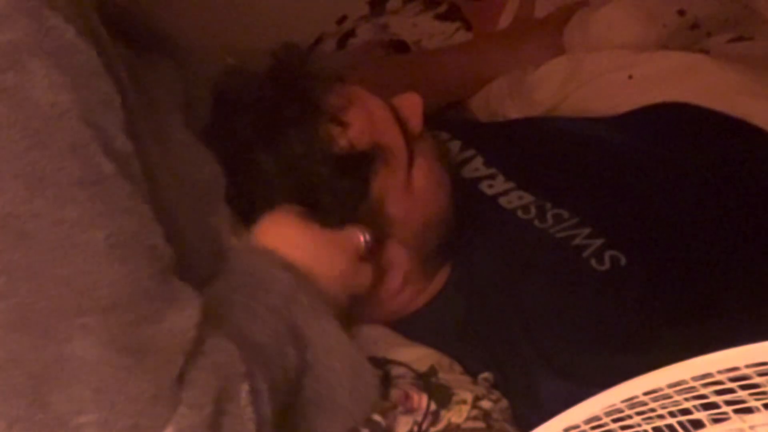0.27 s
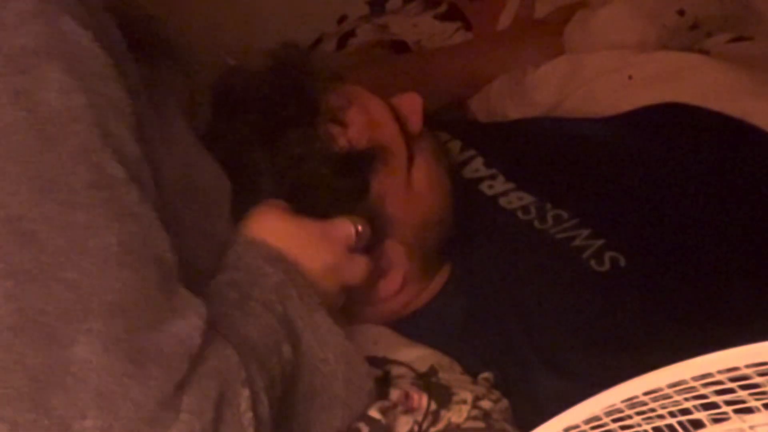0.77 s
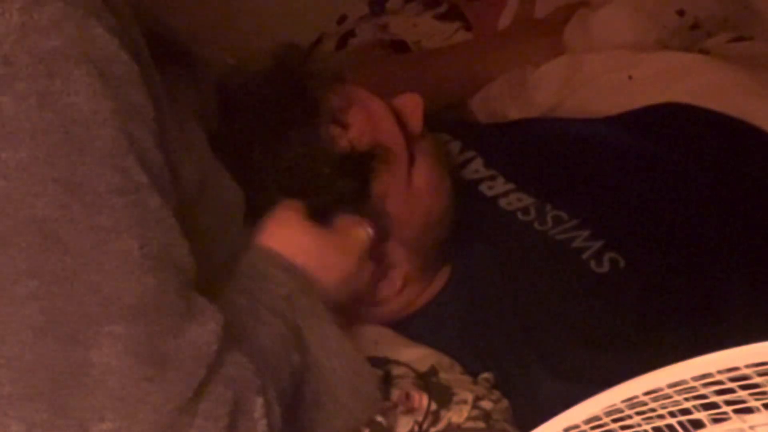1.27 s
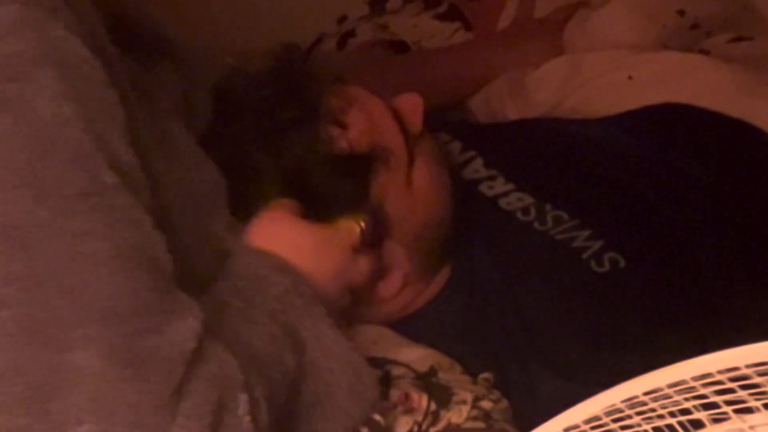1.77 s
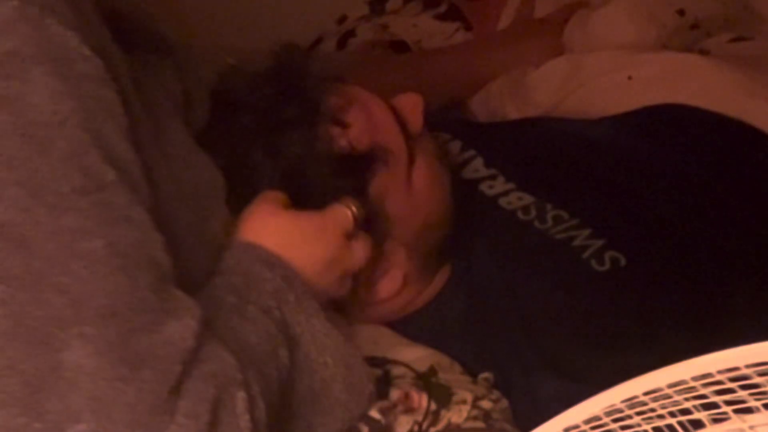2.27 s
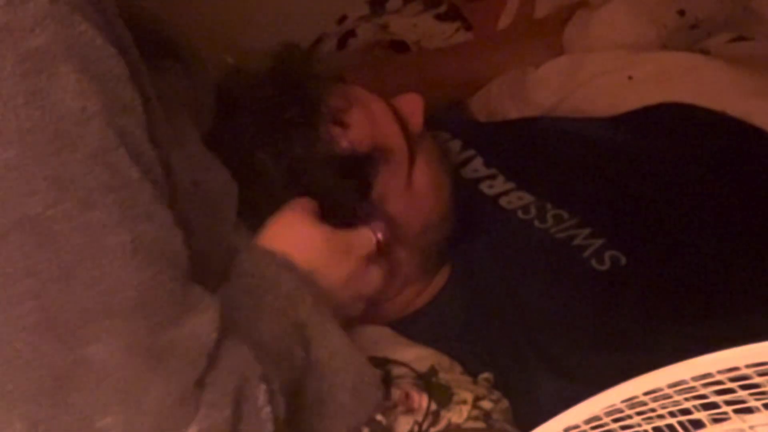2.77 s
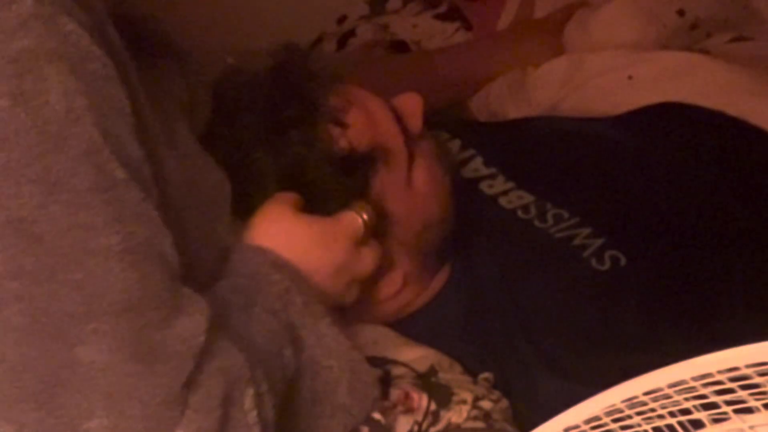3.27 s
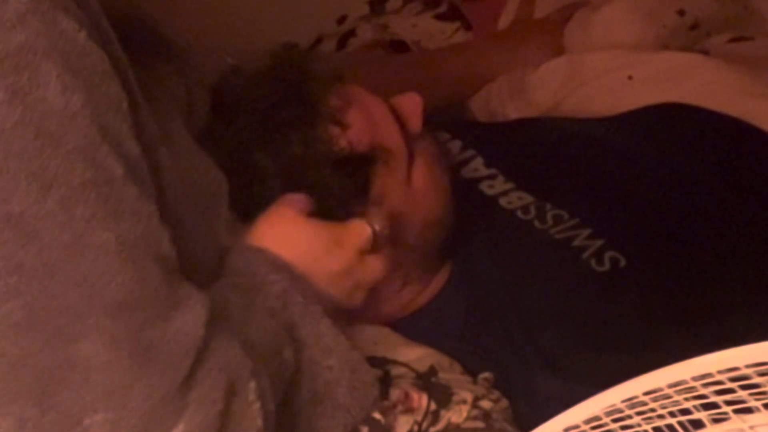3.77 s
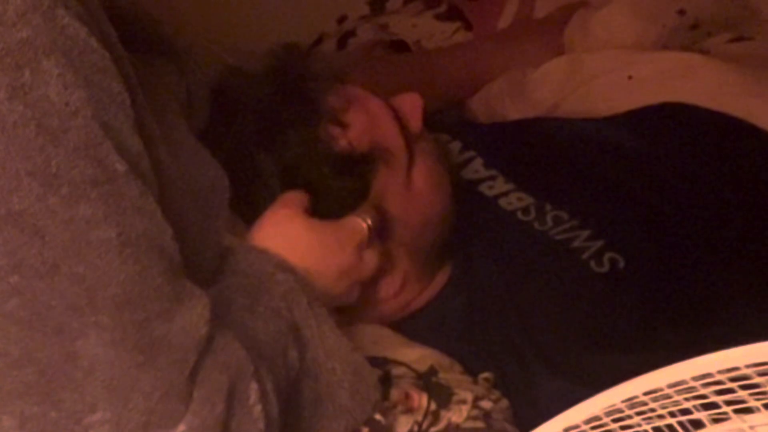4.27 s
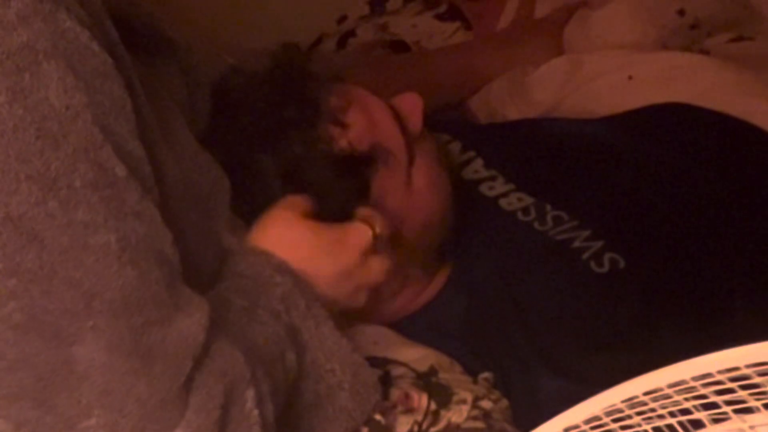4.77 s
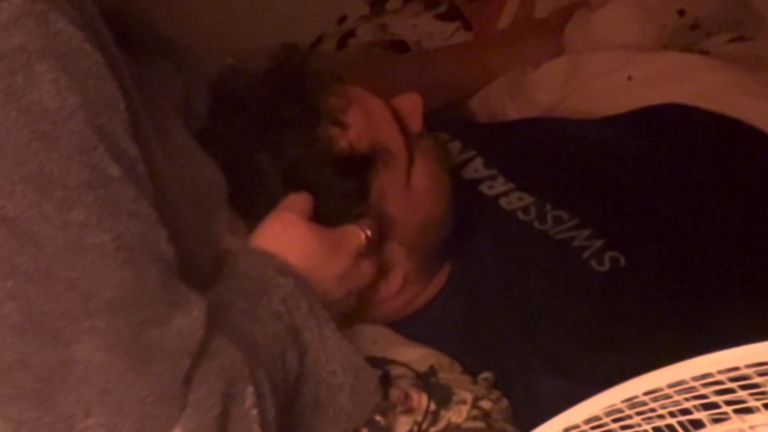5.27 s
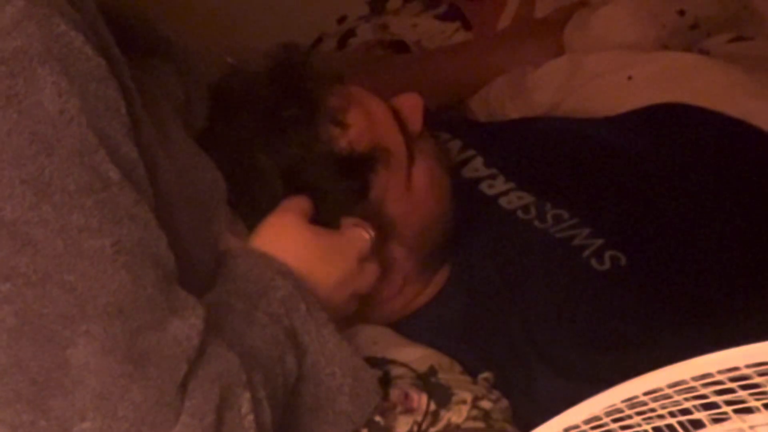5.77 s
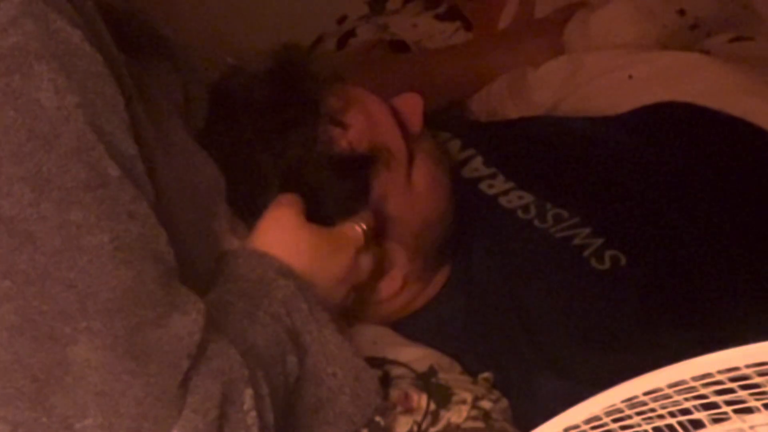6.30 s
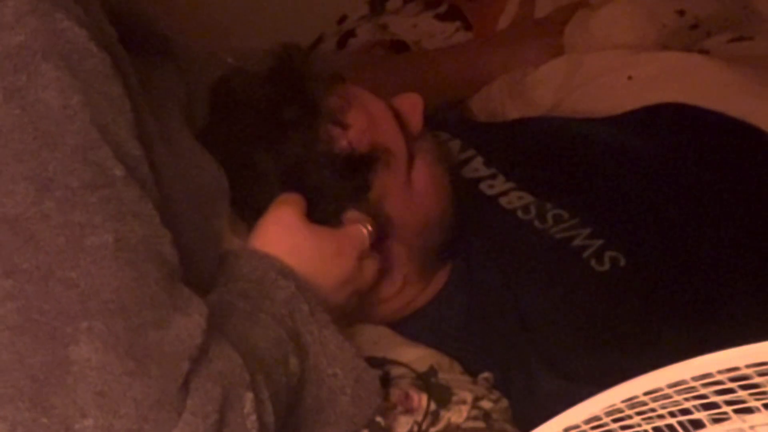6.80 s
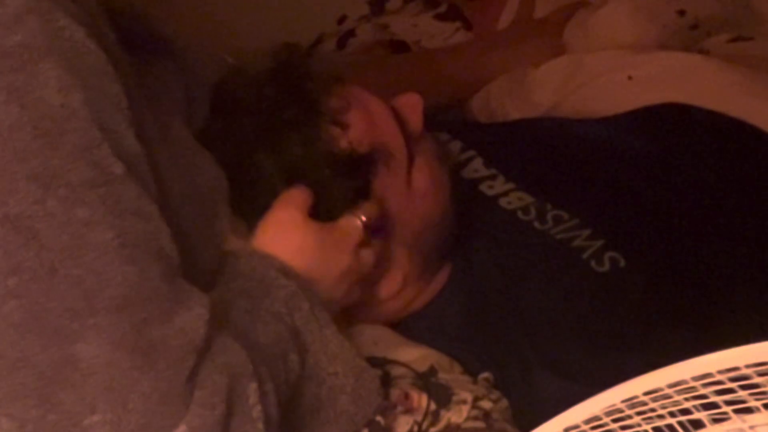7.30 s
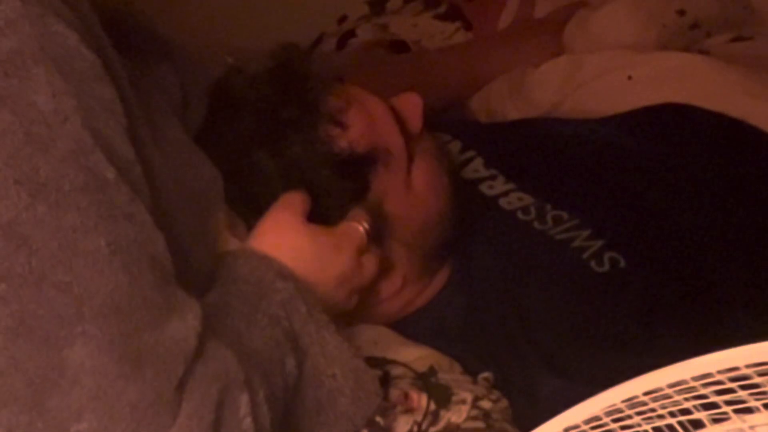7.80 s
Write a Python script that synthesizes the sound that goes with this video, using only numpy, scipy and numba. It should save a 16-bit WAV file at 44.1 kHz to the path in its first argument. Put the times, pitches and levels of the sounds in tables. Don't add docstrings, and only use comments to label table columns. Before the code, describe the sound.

A steady, deep mains hum and faint fan rush with weak motor tones run throughout, with slow low air movement at the microphone. From 0 s fingertips scratch hair very close by: short bright, papery crackles made of tiny ticks, with a cluster of sharp snaps at 0.2-0.5 s and a softer drag to about 1 s. Gentler strokes follow at 1.2, 1.6 and 2 s, with dull sleeve brushes on bedding, notably a bump near 2.6 s. Quick small scratches come at 2.9-3.7 s, then a pause. A crisp, snapping burst with light scalp knocks fills 4.1-4.6 s. Dense crackling returns at 5.1-5.6 s, then cloth rustles to 5.9 s. Another snappy flurry runs 6.2-6.7 s, a short cloth thump lands at 7.1 s, and final dry scratches at 7.3-7.8 s end with a small rustle near 8 s. No echo.

```python
import sys
import numpy as np
from scipy import signal
from scipy.io import wavfile
from scipy.ndimage import uniform_filter1d
from numba import njit

SR = 44100
rng = np.random.default_rng(int(sys.argv[2]) if len(sys.argv) > 2 else 0)


def voltage_ratio(decibels):
    exponent = np.asarray(decibels, float) / 20
    return 10 ** exponent


def digitize_waveform(pressure):
    field = np.atleast_2d(pressure).T
    bounded = np.clip(field, -1, 1)
    quanta = np.round(bounded * 32767).astype(np.int16)
    wavfile.write(sys.argv[1], SR, quanta)


N = 354828

# (per Hz, relative)
FAN_SPECTRUM = [(60, 9.5), (120, 4), (250, -4), (500, -26), (1000, -17.5), (2000, -32), (4000, -18),
                (7000, -22.5), (11000, -22.5), (17000, -16)]
MOTOR_TONE_HZ = [100.1, 150, 249.8, 349.8, 495.8, 589.1, 908.6, 949.4, 991.1]
MOTOR_TONE_DB = [-70, -81, -75, -69, -81, -75.5, -74, -84, -90]
# start_s, length_s, end_level_db, ring_hz,
# scrape_db (dull scalp scrape over crackle)
DRAGS = [(.0, 0.11, -58.5, 10500, 4), (.14, 0.095, -51.5, 11800, -11), (.3, 0.16, -48.5, 11960, -20),
         (.5, 0.086, -50, 11700, -10), (.64, 0.32, -53, 10700, -4), (1.18, 0.1, -52.5, 10660, -3),
         (1.57, 0.36, -50.5, 12050, -16), (1.97, 0.31, -52.5, 10570, -6), (2.52, 0.077, -54.5, 10900, -8),
         (2.86, 0.083, -58.5, 11700, -5), (3.0, .09, -53, 11300, -9), (3.16, 0.084, -53.5, 10800, -9),
         (3.32, .16, -51.5, 10600, -9.5), (3.63, .12, -64, 10700, -2), (4.08, 0.085, -53, 10800, -12),
         (4.19, 0.38, -50.5, 10960, -8.5), (5.14, 0.26, -51.5, 11500, -12),
         (5.37, 0.26, -51.5, 11100, -8.5), (6.22, 0.22, -55.5, 11200, -13), (6.53, 0.21, -49.5, 11200, -7),
         (7.07, 0.056, -61, 11200, -13), (7.33, 0.25, -54.5, 11300, -10), (7.62, 0.22, -49.5, 10800, -7),
         (7.94, .04, -63, 11500, -9)]
# time_s, share (1 = crisp)
DRYNESS = [(0, 0.29), (.7, 0.34), (2.4, 0.23), (3.1, 0.66), (3.4, 0.35), (4.05, 0.37), (4.25, 0.8),
           (5.4, 0.39), (5.6, 0.3), (6.3, 0.66), (6.75, .5), (7.5, 1)]
# start_s, length_s, level_db,
# brightness_db (swish up and rumble down), hollow_db (fold over the rest)
SLEEVE_STROKES = [(0, 0.17, -52.5, -0.5, -0.5), (.25, 0.36, -58.5, -1, 1), (.9, 0.13, -64, 5.5, 3),
                  (1.18, .13, -56, 0.5, -2.5), (1.6, 0.3, -60, -1, -8), (2.44, 0.1, -62.5, 4.5, 10),
                  (2.575, 0.066, -51, 0, -2.5), (2.68, 0.064, -55.5, -1, -5), (3.03, .35, -61, -3, 2.5),
                  (3.63, 0.17, -56, -0.5, -7), (4.35, 0.054, -69, 0, 8), (4.55, 0.31, -58.5, -1, -6),
                  (5.38, 0.17, -58.5, -1.5, -2.5), (5.68, 0.13, -55, -1.5, -1),
                  (5.89, 0.044, -55, -2.5, -3.5), (6.15, 0.23, -60.5, -5, 1), (6.6, 0.22, -62, 0, -8),
                  (7.085, 0.039, -47, -2, -7.5), (7.35, 0.43, -63, -0.5, 0), (7.93, 0.056, -54, 0, -1.5)]
# start_s, length_s, rate_per_s, peak_db
SNAP_FLURRIES = [(.18, .34, 35, -37), (1.79, .14, 30, -41), (2.98, .08, 50, -37), (3.2, .05, 40, -40),
                 (4.15, .16, 90, -37), (4.35, .21, 60, -37), (5.15, .07, 200, -37), (5.24, .08, 220, -36),
                 (5.33, .26, 60, -39), (6.24, .41, 90, -38), (7.52, .31, 30, -39)]
# time_s, peak_db, ring_hz
SCALP_KNOCKS = [(.1856, -37, 11700), (.5096, -33.5, 11300), (0.5165, -32, 11100), (3.237, -38, 11200),
                (4.141, -28.5, 9400), (4.2751, -33, 9900), (4.2971, -34, 10000), (4.3523, -35, 10700),
                (4.481, -26, 11700), (5.2703, -29, 11800), (5.35, -31, 11600), (5.3856, -29, 11800),
                (5.4693, -28, 10800), (5.5307, -31, 10700), (5.584, -45, 10700), (6.346, -29.5, 10500),
                (6.43, -32, 10600), (6.443, -27.5, 10900), (6.4812, -26, 11300), (6.5296, -41, 11500),
                (6.5743, -28.5, 11600), (7.627, -30, 11800), (7.7179, -32, 11200), (7.8177, -31, 10600)]
# time_s, peak_db, ring_hz, dull_db (dull part over ring)
LOUD_SNAPS = [(.2751, -26, 12200, -21), (.3225, -29, 10700, -25), (.3647, -24, 12600, -13),
              (.4448, -21, 11400, -15), (.4907, -26, 11200, -24), (1.7799, -34, 11700, -19),
              (2.9765, -31, 11800, -16), (3.0523, -34, 11600, 0), (3.0696, -28, 10300, -8),
              (3.334, -30, 11600, -9), (4.1377, -21, 10460, -10), (4.2087, -34, 10500, -23),
              (4.2314, -31, 10100, -9), (4.3225, -35, 11000, -12), (4.3394, -27, 10800, -6),
              (4.3465, -23, 10200, -22), (4.387, -25, 11000, -16), (5.2019, -27, 10600, -25),
              (5.248, -24, 11300, -25), (5.2778, -33, 11200, -16), (5.2974, -24, 11400, -26),
              (6.2955, -29, 10800, -15), (6.3724, -31, 10900, -21), (6.419, -24, 11700, -18),
              (6.475, -32, 11300, -22), (6.4897, -25, 12200, -10), (6.5108, -25, 11200, -20),
              (7.409, -29, 10500, -10), (7.4696, -28, 10400, -15), (7.546, -26.5, 10700, -6)]

HUM_HZ, HUM_DB, HUM_PHASE_RAD = 49.955, -32.5, -1.27
AIR_HZ, AIR_DB = 5.6, -37
FAN_DB = -54
DRAG_SWELL_DB_PER_S, DRAG_RISE_DB_PER_S, DRAG_FALL_DB_PER_S = 20, 178, 330
HAND_REST = (-72, 11200, -4)  # level_db, ring_hz, scrape_db of fingers lying in the hair
RING_HZ_PER_DB = 69
RING_WIDTH_HZ, RING_WANDER = 3500, .06
BRUSH_RISE_DB_PER_S, BRUSH_FALL_DB_PER_S = 95, 210
CLOTH_REST = (-67, 1.5, -1)  # level_db, brightness_db, hollow_db
RUMBLE_DB, SWISH_DB, SHEEN_DB = -0.4, -3, -7.5
FLURRY_DB, FLURRY_SPREAD_DB, FLURRY_SPREAD_HZ = 3.4, -1.5, 380
FLURRY_DULL_DB, FLURRY_DULL_SPREAD_DB = -27, 1
KNOCK_DULL_DB = -10
TOP_HZ, END_S, FADE_S = 15770, 8.046, .004


def level(x, db):
    return x * voltage_ratio(db) / np.sqrt(np.mean(x ** 2))


@njit
def svf(x, hz, width):
    y, band_state, low_state = np.empty(len(x)), 0., 0.
    for i in range(len(x)):
        g = np.tan(np.pi * hz[i] / SR)
        damping = width / hz[i]
        v = (band_state + g * (x[i] - low_state)) / (1 + g * (g + damping))
        band_state = 2 * v - band_state
        low_state = low_state + 2 * g * v
        y[i] = damping * v
    return y


def band(x, hz, width):
    return svf(x, np.clip(hz * np.ones(N), 1., .45 * SR), 1. * width)


def walk(rate):
    k = int(SR / rate)
    held = np.repeat(rng.standard_normal(N // k + 1), k)
    return 0.86 * uniform_filter1d(uniform_filter1d(held, k), k)[:N]


def slips(rate, spread_db):
    happens = rng.random(N) < rate / SR
    size = rng.exponential(size=N)
    sign = rng.choice([-1., 1.], N)
    return level(happens * sign * voltage_ratio(spread_db * size), 0)


def gestures(table, rest, rise, fall, swell):
    t = np.arange(0, N, 32) / SR
    start, length, db, *columns = (c[:, None] for c in np.transpose(table))
    late = t - start - length
    ramp_db = -rise * np.clip(start - t, 0, None) - fall * np.clip(late, 0, None)
    power = voltage_ratio(db + swell * np.clip(late, -length, 0) + ramp_db) ** 2
    rest_power = voltage_ratio(rest[0]) ** 2
    total = power.sum(axis=0) + rest_power
    shortfall_db = 10 * np.log10(power + 1e-18) - db
    curves = [10 * np.log10(total), (power * shortfall_db).sum(axis=0) / total]
    for column, at_rest in zip(columns, rest[1:]):
        curves.append(((power * column).sum(axis=0) + rest_power * at_rest) / total)
    return [np.interp(np.arange(N) / SR, t, c) for c in curves]


def hum():
    tone = np.sqrt(2) * voltage_ratio(HUM_DB) * np.cos(2 * np.pi * HUM_HZ * np.arange(N) / SR + HUM_PHASE_RAD)
    air = band(rng.standard_normal(N), .5 * AIR_HZ, AIR_HZ) * voltage_ratio(6.3 * walk(1.655))
    air = signal.sosfilt(signal.butter(2, 34, fs=SR, output="sos"), air)
    return tone + level(air, AIR_DB)


def fan():
    table_hz, table_db = np.transpose(FAN_SPECTRUM)
    rush = 0
    for hz in 60 * 2 ** np.arange(0, 8.6, .5):
        db = np.interp(np.log(hz), np.log(table_hz), table_db) + 1.5 * walk(6)
        rush = rush + voltage_ratio(db) * band(rng.standard_normal(N), hz, hz / 1.21)
    t = np.arange(N) / SR
    tones = 0
    for hz, db in zip(MOTOR_TONE_HZ, MOTOR_TONE_DB):
        loudness = voltage_ratio(db + 3.5 + 2.6 * walk(2.47))
        cycles = hz * t + .06 * walk(1.17) + rng.random()
        tones = tones + loudness * np.sin(2 * np.pi * cycles)
    return level(rush, FAN_DB) + tones


def hand():
    db, slack_db, hz, scrape_db = gestures(DRAGS, HAND_REST, DRAG_RISE_DB_PER_S,
                                           DRAG_FALL_DB_PER_S, DRAG_SWELL_DB_PER_S)
    return db, hz + RING_HZ_PER_DB * slack_db, scrape_db


def crackle():
    crackle_db, ring_hz, scrape_db = hand()
    times, share = np.transpose(DRYNESS)
    dry = np.interp(np.arange(N) / SR, times, share) * np.clip((crackle_db + 66) / 12, 0, 1)
    bunches = voltage_ratio(dry * (2.5 * walk(300) + 4.3 * walk(110) + 1.6 * walk(40)))
    ticks = level(slips(rate=4500, spread_db=2.0) * bunches, 0)
    ring_hz = ring_hz * (1 + RING_WANDER * walk(300))
    ring = level(band(band(ticks, ring_hz, RING_WIDTH_HZ), ring_hz, 4 * RING_WIDTH_HZ), 0)
    skirt = level(band(ticks, 9370, 7200), -6)
    scrape = level(band(band(ticks, 8100, 8800), 2650, 3360), -2.2)
    return voltage_ratio(crackle_db) * (ring + skirt + voltage_ratio(scrape_db) * scrape)


def sleeve():
    cloth_db, _, bright_db, hollow_db = gestures(SLEEVE_STROKES, CLOTH_REST, BRUSH_RISE_DB_PER_S,
                                                 BRUSH_FALL_DB_PER_S, 0)
    rumble_db = cloth_db + RUMBLE_DB - bright_db
    fold_db = cloth_db + hollow_db
    swish_db = cloth_db + SWISH_DB + bright_db
    lumps = voltage_ratio(1.9 * walk(25))
    modes = ((rumble_db, 180, 170), (fold_db, 370, 330),
             (swish_db, 1150, 2000), (swish_db + SHEEN_DB, 6000, 11000))
    out = 0
    for db, hz, width in modes:
        fibres = slips(rate=9000, spread_db=2.1) * lumps
        out = out + voltage_ratio(db) * level(band(band(fibres, hz, width), hz, 2 * width), 0)
    return out


def flurries():
    rows, ring_hz = [], hand()[1]
    for start, length, rate, db in SNAP_FLURRIES:
        count = round(length * rate)
        s = start + length * rng.random(count)
        chance = rng.standard_normal((3, count))
        peak_db = db + FLURRY_DB + FLURRY_SPREAD_DB * chance[0]
        hz = ring_hz[(s * SR).astype(int)] + FLURRY_SPREAD_HZ * chance[1]
        dull_db = FLURRY_DULL_DB + FLURRY_DULL_SPREAD_DB * chance[2]
        rows += zip(s, peak_db, hz, dull_db)
    return rows


def snaps(rows):
    s, peak_db, hz, dull_db = (c[:, None] for c in np.transpose(rows))
    chance = rng.random((len(s), 3))
    t = (np.arange(500) - 24) / SR
    rise_s, fall_s = .00012, .00014 * (1 + .6 * chance[:, :1])
    shape = np.where(t < 0, np.exp(-(t / rise_s) ** 2), 1 / np.cosh(t / fall_s))
    ring = shape * np.sin(2 * np.pi * (hz * t + chance[:, 1:2]))
    dull_hz = 4400 + 1800 * chance[:, 2:]
    dull = np.exp(-(t / 0.00014) ** 2) * np.sin(2 * np.pi * dull_hz * t)
    scatter = uniform_filter1d(rng.standard_normal(ring.shape), size=5, axis=1)
    decay = (t > 0) * (np.exp(-t / 0.00067) + voltage_ratio(-15) * np.exp(-t / 0.011))
    tail = voltage_ratio(-3.5) * decay * scatter * np.sin(2 * np.pi * hz * t)
    snap = voltage_ratio(peak_db + 0.5) * (ring + tail + voltage_ratio(dull_db - 1.1) * dull)
    out = np.zeros(N + len(t))
    np.add.at(out, np.round((s + t) * SR).astype(int), snap)
    return out[:N]


def knocks():
    return snaps([(*row, KNOCK_DULL_DB) for row in SCALP_KNOCKS])


def scene():
    room = hum() + fan()
    friction = crackle() + sleeve()
    releases = snaps(flurries()) + knocks() + snaps(LOUD_SNAPS)
    return (room + friction + releases)[None]


def band_limit(x):
    return signal.sosfilt(signal.butter(12, 16500, fs=SR, output="sos"), x)


def record(dry):
    top = signal.ellip(14, .2, 60, TOP_HZ, fs=SR, output="sos")
    fade = np.clip((END_S - np.arange(N) / SR) / FADE_S, 0, 1)
    mix = signal.sosfiltfilt(top, dry * fade)
    return band_limit(mix)


dry = scene()
out = record(dry)
digitize_waveform(out)
```